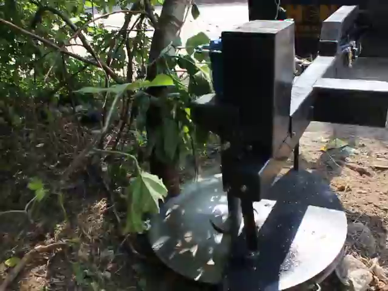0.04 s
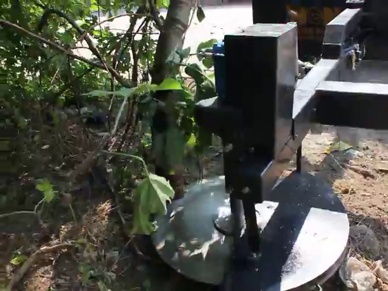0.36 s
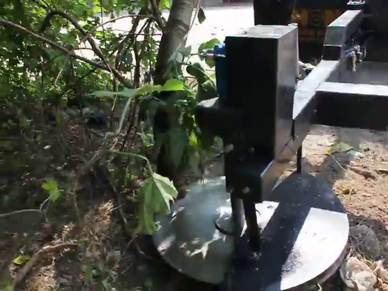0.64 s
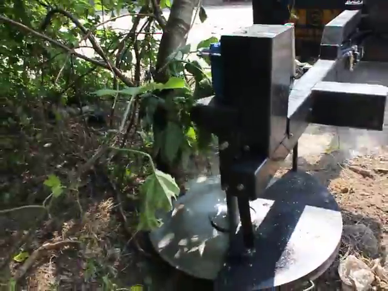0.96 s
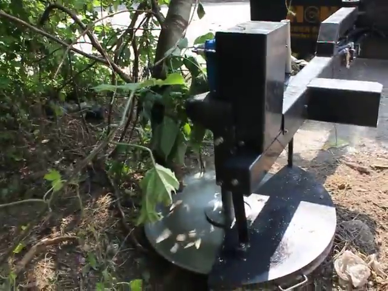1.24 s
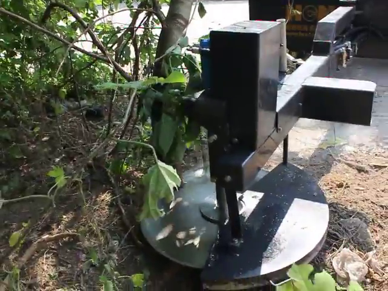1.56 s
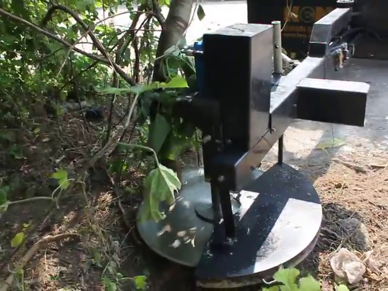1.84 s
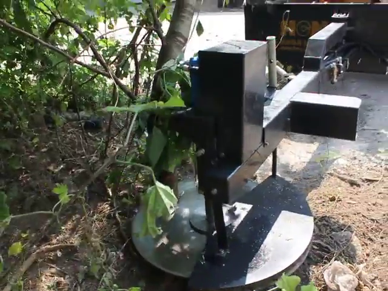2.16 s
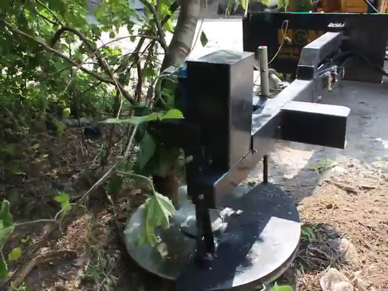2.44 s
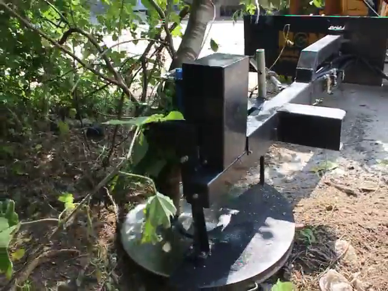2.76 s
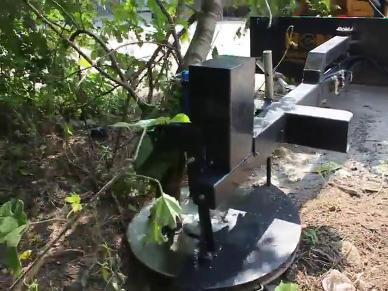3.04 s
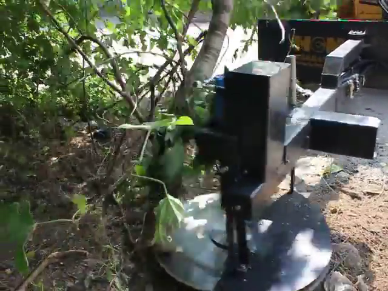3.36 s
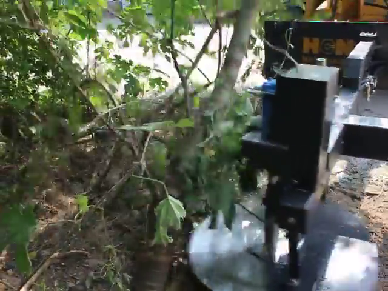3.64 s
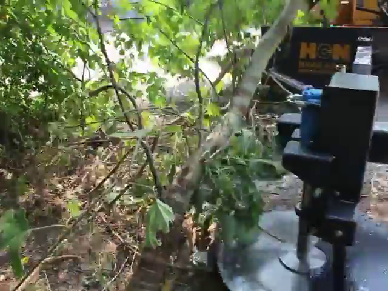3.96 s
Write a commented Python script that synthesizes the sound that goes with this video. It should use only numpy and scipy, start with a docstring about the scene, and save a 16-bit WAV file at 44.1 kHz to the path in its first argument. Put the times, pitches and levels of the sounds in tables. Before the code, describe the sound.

A disc saw whines and rasps through a small tree, close by outdoors, with brief metallic squeals over a droning engine. Around 2.2 seconds it screeches and drops in pitch. From about 2.9 seconds the blade groans lower and the engine slows, with harsh scrapes from 3.2 to 3.5. Sharp wood cracks come between 3.5 and 4 seconds as the saw stops and leaves rustle lightly.

```python
"""A disc saw fells a small tree

A hydraulic saw cuts outdoors, close to a mono microphone. Its teeth whine and rasp in the trunk
and ring the steel disc over a droning engine. The disc slows, binds and groans, the engine is
dragged down, the trunk cracks and the leafy crown starts to rustle over."""
import sys
import numpy as np
from scipy import signal
from scipy.fft import rfft, irfft, next_fast_len
from scipy.io import wavfile
from scipy.ndimage import map_coordinates

SR = 44100
rng = np.random.default_rng(int(sys.argv[2]) if len(sys.argv) > 2 else 0)


def pcm_store(signal):
    """Save signal as 16-bit PCM."""
    levels = np.round(np.clip(np.atleast_2d(signal), -1, 1) * 32767)
    wavfile.write(sys.argv[1], SR, levels.astype(np.int16).T)


N = 176400
T = np.arange(N) / SR

# How often teeth hit the wood, and how loudly they whine: t/s, f/Hz, level/dB
TOOTH_RATE = [(.04, 785, -26.5), (.12, 805, -34), (.2, 832.4, -33.5), (.33, 894, -30), (.46, 926, -29),
              (.63, 944, -28), (.8, 946.5, -27.5), (.95, 939, -28), (1.1, 916.4, -30.5), (1.2, 927, -43),
              (1.31, 948, -26), (1.52, 925, -28), (1.73, 895, -30), (1.85, 909, -39), (2, 936, -35.5),
              (2.1, 935, -32), (2.19, 888, -28.5), (2.26, 800, -41), (2.33, 722, -38), (2.42, 704, -34.5),
              (2.6, 691, -63)]
# Tones in the whine: multiple of the tooth rate, level/dB
WHINE_TONES = [(1, -15.5), (2, -5.5), (3, -18), (4, -1), (5, -11), (6, -4.5), (7, -9), (8, -3), (9, -9),
               (10, -8), (11, -12.5), (12, -7.5), (13, -12.5), (14, -9), (16, -13)]
# The teeth bite: t/s, length/s, multiple of the tooth rate, level/dB
BITES = [(0.048, 0.15, 2, -38), (0.175, 0.39, 2, -27), (0.335, 0.17, 6, -35), (2.071, 0.072, 4, -23),
         (2.147, .11, 8, -20.5), (2.191, .16, 4, -23), (2.28, 0.095, 8, -24.5), (2.277, 0.2, 2, -30.5)]
# Rasp of the cut in three bands: t/s, mid level/dB, high level/dB, top level/dB
RASP_LEVELS = [(0.05, -29, -18.5, -26), (0.38, -21.5, -17.5, -26), (0.8, -24.5, -17, -21.5),
               (0.86, -30, -18.5, -25.5), (1.11, -25.5, -18, -22), (1.2, -28.5, -23, -27.5),
               (1.3, -26, -20, -26), (1.57, -26, -17.5, -21.5), (1.85, -25.5, -21.5, -29.5),
               (1.94, -24, -20, -27), (2.22, -23.5, -19, -24), (2.43, -29.5, -26, -33),
               (2.53, -25, -22, -20), (2.55, -26.5, -23, -33.5), (2.8, -22, -23, -27.5),
               (2.96, -24.5, -29, -35.5), (3.01, -33, -28.5, -39), (3.04, -21, -29.5, -41),
               (3.06, -24.5, -31, -52), (3.16, -29.5, -31, -49)]
# Tone colour of the rasp with the disc running fast: f/Hz, level/dB
FAST_COLOUR = [(240, -41), (400, -9), (520, -12), (630, -2), (740, -6.5), (830, -6.5), (940, 0.5),
               (1100, -10.5), (1300, -1.5), (1450, -6), (1800, -0.5), (2100, -8.5), (2400, -4.5),
               (3050, -5), (3800, -4), (4200, -6), (4550, -8), (5000, -4.5), (5700, -4.5), (6100, -5),
               (7400, -4), (8200, -7), (10000, -10.5), (11500, -9), (15900, -13)]
# The same with the disc labouring: f/Hz, level/dB
SLOW_COLOUR = [(240, -32), (400, -3.5), (510, -5.5), (666, 1), (753, -5.5), (1030, -0.5), (1130, -11),
               (1710, -5), (1960, -12), (2120, -9), (3930, -14.5), (5030, -11), (5870, -17), (12900, -18.5),
               (16000, -23.5)]
# Notes the steel disc rings at (its modes): f/Hz, half-width/Hz, level/dB
DISC_MODES = [(641, 24, -3.5), (745, 9, -5.5), (1309, 14, -5.5), (1757, 15, -9), (1848, 8, -4),
              (2710, 13, -2), (3027, 32, 2.5), (3210, 8.1, -6), (3343, 14, -4), (3674, 12, -1),
              (4510, 180, 3.5), (5390, 33, 3), (5635, 9, 2), (5874, 34, 1), (6250, 120, 2.5),
              (6800, 30, 0.5), (7270, 75, -2)]
# Squeals of the disc: t/s, length/s, f/Hz, level/dB, phase wander/rad
SQUEALS = [(0.032, 0.093, 3270, -22.5, 0.81), (0.014, 0.094, 7120, -18.5, 1.1),
           (0.196, 0.115, 3300, -25, 0.79), (0.788, 0.26, 4190, -25.5, 2.4), (.838, 0.13, 5670, -19, .45),
           (1.291, .14, 5640, -26, 0.6), (1.557, 0.065, 2770, -25.5, .4), (1.59, 0.11, 6820, -23, .7),
           (1.918, 0.12, 1850, -27, 0.31), (3.197, 0.025, 1750, -23, 1), (3.25, 0.045, 2775, -20.5, .6)]
# How often the stalling disc slips in the wood: t/s, f/Hz, level/dB
SLIP_RATE = [(2.7, 983.6, -67), (2.86, 938, -29), (2.96, 846.5, -26), (3.04, 690, -28.5),
             (3.14, 621.4, -35), (3.28, 411.3, -28), (3.325, 367, -19.5), (3.355, 343.4, -23.5),
             (3.41, 255.6, -24.5), (3.46, 277.8, -25.5), (3.48, 294.3, -37), (3.505, 281.5, -31.5),
             (3.513, 263, -15), (3.536, 267, -18.5), (3.546, 260, -20), (3.6, 254.6, -45),
             (3.62, 239.2, -61)]
# The trunk pinches the disc: t/s, hold/s, level/dB, brightness/(dB per octave)
PINCHES = [(3.171, 0.027, -21.5, -1), (3.203, .008, -22.5, -4), (3.24, 0.018, -15.5, 1),
           (3.279, .036, -20.5, 3.5), (3.334, 0.055, -25, -1), (3.403, 0.044, -21.5, 7.5)]
# Tone colour of a pinch: f/Hz, level/dB
PINCH_COLOUR = [(240, -38), (400, -22), (446, -27), (520, -5), (616, -6), (666, -6), (777, -11), (921, -6),
                (1330, -10), (1680, -3.5), (2120, -10), (2840, -5), (3530, -7), (4580, -11), (7170, -15.5),
                (7990, -24), (16000, -41)]
# Notes of the pinched disc: f/Hz, half-width/Hz, level/dB
PINCH_MODES = [(662, 19, 4), (1654, 52, -2), (2820, 75, -6), (3460, 100, 0), (6700, 220, -10)]
# Wood fibres break: t/s, level/dB, brightness/(dB per octave)
CRACKS = [(3.4612, -0.5, 3), (3.5555, -15, 2), (3.5667, -3, 0), (3.5697, -11.5, -5.5), (3.5914, -13, 7),
          (3.6012, -10, 0), (3.6043, -1.5, -0.5), (3.6082, -21, 1), (3.6146, -13.5, -1), (3.7714, -13.5, 3),
          (3.839, -22, 4), (3.8809, -23, 0), (3.9966, 4.5, 3)]
# Tone colour of a crack: f/Hz, level/dB
CRACK_COLOUR = [(200, -4), (1000, -18), (3000, -8), (5500, 3), (9000, -1), (15000, 1)]
# How often the engine fires: t/s, f/Hz, exhaust level/dB, hum level/dB
FIRING_RATE = [(0, 68.1, -41, -44), (.12, 69.8, -42, -38.5), (.26, 71.35, -34, -25),
               (.5, 73.55, -32.5, -27), (.72, 75.7, -31.5, -31), (.95, 76.2, -40, -46),
               (1.3, 76, -37.5, -36), (1.75, 75.53, -39, -40.5), (2, 75.83, -35, -47),
               (2.5, 75.33, -39, -36.5), (2.76, 76.22, -34.5, -31), (2.9, 72.5, -33.5, -28),
               (3.1, 66.4, -30.5, -32), (3.22, 63, -27, -43), (3.33, 59.64, -36, -44), (3.55, 52, -40, -50),
               (3.65, 48.7, -47, -55), (3.78, 44.06, -43.5, -59), (4, 38.4, -39, -38)]
# Tones in the exhaust: multiple of the firing rate, level/dB
EXHAUST_TONES = [(1, -0.5), (2, -12.5), (2.5, -13), (3, -5), (3.5, -6), (4, -7), (4.5, -6.5), (8, -10),
                 (9, -13)]
# Low rumble of the machine: t/s, level/dB
RUMBLE_LEVEL = [(.05, -39), (.26, -29.5), (.68, -28.5), (.97, -38), (1.33, -32.5), (1.82, -34.5), (2, -27),
                (2.39, -34.5), (2.8, -28), (3.15, -25.5), (3.26, -29.5), (3.45, -27), (3.56, -25),
                (3.63, -48), (3.72, -33), (3.98, -38)]
# Tone colour of the rumble: f/Hz, level/dB
RUMBLE_COLOUR = [(40, -50), (85, -14), (110, -9.5), (137, -4), (183, -6.5), (240, 2), (285, 0.5),
                 (330, -2.5), (390, -5.5), (470, -16.5), (600, -13.5), (1200, -61)]
# Loudness of the pump under load: t/s, level/dB
PUMP_LEVEL = [(2.25, -74), (2.36, -31), (2.55, -35), (2.66, -30.5), (2.88, -28), (2.98, -55), (3.1, -70)]
# Pitch of the pump: t/s, f/Hz
PUMP_PITCH = [(2.3, 1000), (2.5, 1006), (2.64, 1051), (2.88, 1056), (3.1, 950)]
# Rustle of the falling crown: t/s, level/dB
LEAF_LEVEL = [(3.4, -29), (3.6, -38.5), (3.7, -41), (3.8, -38.5), (3.87, -33), (3.94, -31.5)]
# Tone colour of the leaves: f/Hz, level/dB
LEAF_COLOUR = [(250, -24), (500, -4), (800, -5.5), (1400, -12), (3300, -13), (7000, -17), (16000, -18)]

TILT_PIVOT_HZ = 2500  # brightness tips the tone colour around this frequency


def rasp():
    """Chips tear out of the trunk and ring the disc; the ring is damped as the disc slows."""
    fade_db = 40.5 * np.maximum(T - 3.314, 0)
    mids, highs, top = [amp(db - fade_db) for db in curves(RASP_LEVELS)]
    slow = np.clip((T - 2.386) / 0.28 + .5, 0, 1)  # 0 running fast, 1 labouring
    torn = disc_shimmer(chips(clump_db=1.5, bite=0.47))
    out = np.zeros(N)
    for colour, share, db in ((FAST_COLOUR, 1 - slow, -2.2), (SLOW_COLOUR, slow, -1)):
        tearing = coloured(torn, colour)
        for low_hz, high_hz, level in ((0, 2000, mids), (2000, 8000, highs), (8000, SR, top)):
            band = unit(filtered(tearing, lambda f: (f >= low_hz) & (f < high_hz)))
            out += amp(db + 0.61 * wobble(24.34)) * np.sqrt(share) * level * band
    ring = ringing(DISC_MODES, swell_db=4.0, swell_rate=7.22)
    return out + amp(-5 - 6.15 * slow) * highs * ring


def chips(clump_db, bite):
    """Tearing chips make noise that comes in clumps and pulses with the teeth."""
    tooth_phase = turning(curves(TOOTH_RATE)[0])
    return noise() * amp(clump_db * wobble(450)) * (1 + bite * np.sin(tooth_phase))


def disc_shimmer(x):
    """The disc's many weak, high notes ring on after every chip."""
    t = T[:SR // 3]
    tail = rng.standard_normal(len(t)) * amp(-60 * t / 0.081)  # falls 60 dB in 81 ms
    rung = signal.fftconvolve(x, tail / np.linalg.norm(tail))[:N]
    ring_share = lambda f: 0.56 * f ** 8 / (f ** 8 + 3000.0 ** 8)
    direct = filtered(x, lambda f: np.sqrt(1 - ring_share(f)))
    return direct + filtered(rung, lambda f: np.sqrt(ring_share(f)))


def ringing(modes, swell_db, swell_rate):
    """Noise shakes the disc's strong notes, and each swells on its own."""
    out = np.zeros(N)
    for hz, half_width, db in modes:
        level = amp(db + swell_db * wobble(swell_rate))
        out += level * unit(filtered(noise(), lambda f: 1 / (1 + 1j * (f - hz) / half_width) ** 2))
    return unit(out)


def whine():
    """Teeth pass through the cut and make a tone; their unevenness makes its level waver."""
    hz, db = curves(TOOTH_RATE)
    phase = turning(hz * (1 + 0.00114 * wobble(70)))
    tones = partials(phase, WHINE_TONES, flutter_db=3.5, flutter_rate=30, smear=0.32, smear_rate=200)
    uneven = 1 + .45 * np.sin(phase / 18 + wobble(12)) + .3 * np.sin(phase / 6 + wobble(12))
    return amp(db) * tones * uneven


def bites():
    """As the disc spins up or bogs down, one multiple of the tooth rate screeches and glides with it."""
    phase = turning(curves(TOOTH_RATE)[0])
    out = np.zeros(N)
    for start, length, multiple, db in BITES:
        flutter = amp(1.7 * wobble(300))
        tone = np.sin(round(multiple) * phase + 0.5 * np.sqrt(multiple / 2) * wobble(260))
        out += amp(db) * gate(start, length, edge_s=0.031) * unit(flutter * tone)
    return out


def squeals():
    """Now and then one note of the disc briefly sings, cleanly or roughly."""
    out = np.zeros(N)
    for start, length, hz, db, wander in SQUEALS:
        flutter = amp(1.05 * wobble(200))
        tone = np.sin(2 * np.pi * hz * T + wander * wobble(350))
        out += amp(db) * gate(start, length, edge_s=0.019) * unit(flutter * tone)
    return out


def groan():
    """The disc sticks and slips ever more slowly until it stops."""
    hz, db = curves(SLIP_RATE)
    phase = turning(hz * (1 + 0.085 * wobble(160)))
    return amp(db) * partials(phase, [(1, 1), (2, -22), (3, -17.5)],
                              flutter_db=5.5, flutter_rate=130, smear=0.38, smear_rate=76)


def pinches():
    """The leaning trunk scrapes on the disc in short harsh bursts, each with its own brightness."""
    rise_s, fade_s = .006, .15
    torn = unit(disc_shimmer(chips(clump_db=1.5, bite=0.35)))
    grit = amp(-10) * splinters(per_s=600, scatter_db=1)
    scrape = unit(coloured(torn + grit, PINCH_COLOUR))
    scrape += amp(-8) * ringing(PINCH_MODES, swell_db=2, swell_rate=60)
    out = np.zeros(N)
    for start, hold, db, tilt in PINCHES:
        rise = np.clip((T - start) / rise_s, 0, 1)
        fade_db = 60 * np.maximum(T - start - hold - rise_s, 0) / fade_s
        burst = unit(filtered(scrape, lambda f: amp(tilt * np.log2((f + 1) / TILT_PIVOT_HZ))))
        out += rise * amp(db - fade_db) * burst
    return out


def cracks():
    """Each break in the wood is a very short, dry snap, then fading splinters."""
    hold_s, snap_fade_s, splinter_fade_s = 0.00047, 0.0053, 0.095
    hiss = coloured(noise(), CRACK_COLOUR)
    clicks = unit(coloured(splinters(per_s=1700, scatter_db=2.5), CRACK_COLOUR))
    out = np.zeros(N)
    for start, db, tilt in CRACKS:
        age = np.maximum(T - start, 0)
        tilted = unit(filtered(hiss, lambda f: amp(tilt * np.log2(f / TILT_PIVOT_HZ + .1))))
        snap = amp(-1.5 - 60 * np.maximum(age - hold_s, 0) / snap_fade_s) * tilted
        tail = amp(-17 - 60 * age / splinter_fade_s) * clicks
        out += (T >= start) * amp(db) * (snap + tail)
    return out


def splinters(per_s, scatter_db):
    """Wood fibres part with random clicks."""
    clicks = (rng.random(N) < per_s / SR) * np.sign(noise())
    return unit(clicks * amp(scatter_db * np.clip(noise(), -2, 2)))


def engine():
    """A clean firing tone with rougher exhaust overtones, and a rumble that throbs with the firings."""
    pipe_cut_hz, throb = 47, 0.39
    hz, exhaust_db, hum_db = curves(FIRING_RATE)
    phase = turning(hz)
    tones = partials(phase, EXHAUST_TONES[:1], flutter_db=1, flutter_rate=18, smear=.04, smear_rate=25)
    tones += partials(phase, EXHAUST_TONES[1:], flutter_db=5, flutter_rate=17, smear=.29, smear_rate=21)
    hum = partials(phase, [(5, -1.5), (2, -15.5)],
                   flutter_db=1.2, flutter_rate=20, smear=0.11, smear_rate=30)
    # The pipe weakens the deepest bass.
    exhaust = filtered(amp(exhaust_db) * tones, lambda f: f ** 2 / np.sqrt(f ** 4 + pipe_cut_hz ** 4))
    rumble = unit(coloured(noise() * (1 + throb * np.sin(phase)), RUMBLE_COLOUR))
    return exhaust + amp(hum_db) * hum + amp(curves(RUMBLE_LEVEL)[0]) * rumble


def pump():
    """The hydraulic pump sings as the load rises."""
    phase = turning(curves(PUMP_PITCH)[0])
    tones = partials(phase, [(1, 2), (2, -8)], flutter_db=4, flutter_rate=39, smear=0.32, smear_rate=72)
    return amp(curves(PUMP_LEVEL)[0]) * tones


def leaves():
    """The crown rustles as it tips."""
    rustle = noise() * amp(2.3 * wobble(900))
    return amp(curves(LEAF_LEVEL)[0]) * unit(coloured(rustle, LEAF_COLOUR))


def partials(phase, table, flutter_db, flutter_rate, smear, smear_rate):
    """Stack tones on one pitch; each wavers in level (flutter) and in phase (smear)."""
    out = np.zeros(N)
    for multiple, db in table:
        flutter = amp(flutter_db * wobble(flutter_rate))
        tone = np.sin(multiple * (phase + 7 * rng.random()) + smear * wobble(smear_rate))
        out += amp(db) * unit(flutter * tone)
    return out


def amp(db):
    """Turn decibels into a gain."""
    return 10 ** (np.asarray(db) / 20)


def unit(x):
    """Scale to an average (rms) level of 1."""
    return x / np.sqrt(np.mean(x ** 2) + 1e-20)


def curves(rows):
    """Join a table's points in time: one curve for each column after the first."""
    times, *columns = np.transpose(rows)
    return [np.interp(T, times, column) for column in columns]


def wobble(rate):
    """A smooth curve through `rate` random points a second."""
    points = rng.standard_normal(N // 16)
    grid = np.arange(0, min(T[-1] * rate + 2, len(points) - 1), .25)
    return np.interp(T * rate, grid, map_coordinates(points, [grid]))


def filtered(x, response):
    """Scale each frequency f in x by response(f)."""
    size = next_fast_len(N + 8192)
    return irfft(rfft(x, size) * response(np.fft.rfftfreq(size, 1 / SR)), size)[:N]


def coloured(x, points):
    """Give x the tone colour in a table."""
    hz, db = np.transpose(points)
    return filtered(x, lambda f: amp(np.interp(np.log(f + 1), np.log(hz + 1), db)))


def noise():
    """Fresh white noise."""
    return rng.standard_normal(N)


def turning(hz):
    """Add up a changing frequency into a phase angle."""
    return 2 * np.pi * np.cumsum(hz) / SR


def gate(start, length, edge_s):
    """Rise, hold and fall."""
    return np.clip(np.minimum(T - start, start + length - T) / edge_s, 0, 1)


def scene():
    """All sources, the same on both channels."""
    sawing = engine() + whine() + bites() + rasp() + squeals() + pump() + groan() + pinches()
    mono = sawing + cracks() + leaves()
    return np.array([mono, mono])


def record(dry):
    """The microphone opens, clips at full scale and drops the very highest treble."""
    start_s, top_hz = .036, 15900
    opened = np.clip(dry, -1, 1) * np.clip((T - start_s) / .002, 0, 1)
    return np.array([filtered(x, lambda f: f < top_hz) for x in opened])


dry = scene()
out = record(dry)
pcm_store(out)
```